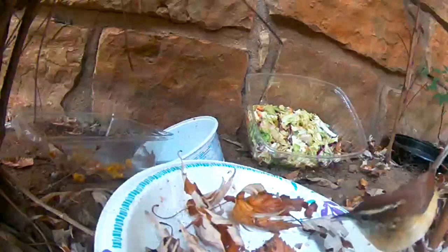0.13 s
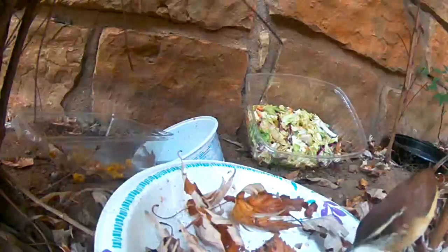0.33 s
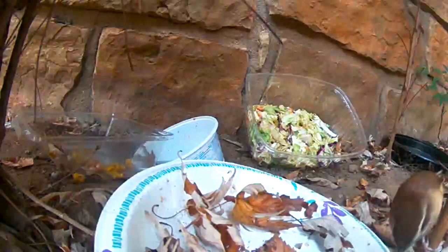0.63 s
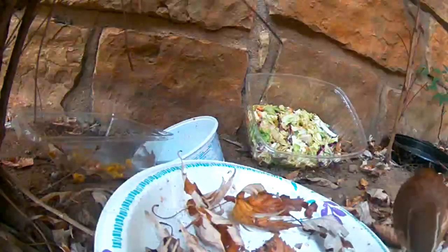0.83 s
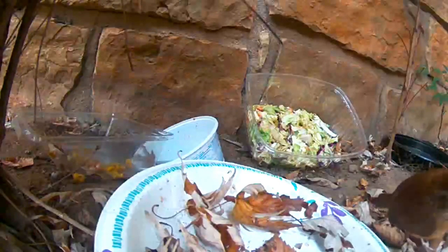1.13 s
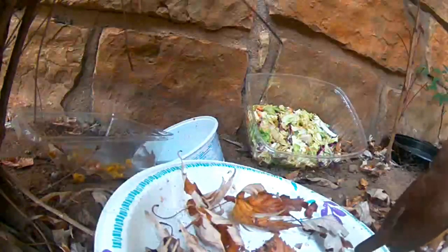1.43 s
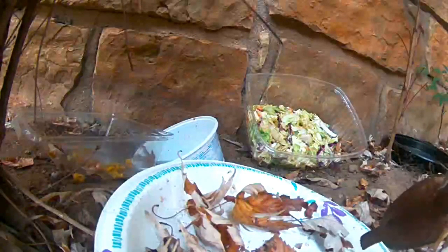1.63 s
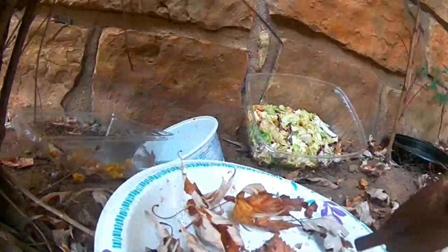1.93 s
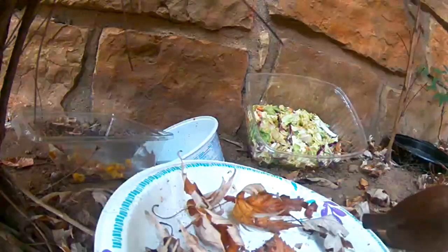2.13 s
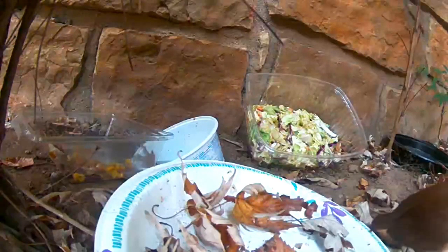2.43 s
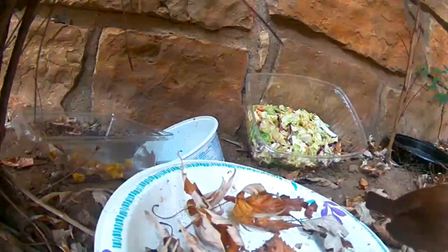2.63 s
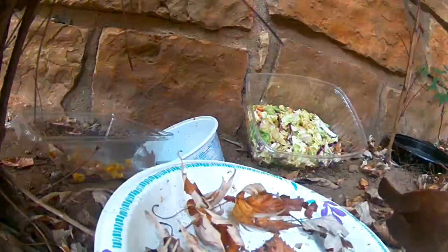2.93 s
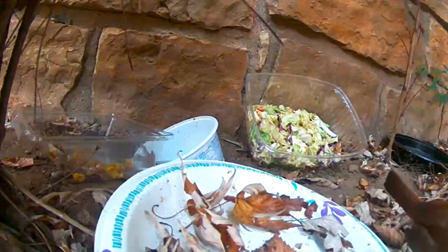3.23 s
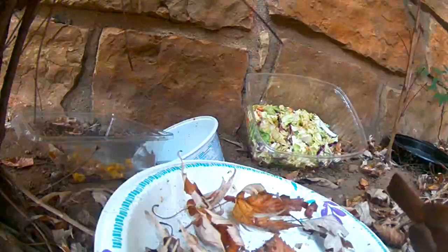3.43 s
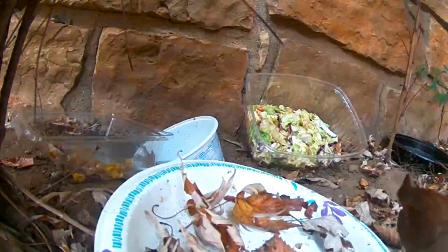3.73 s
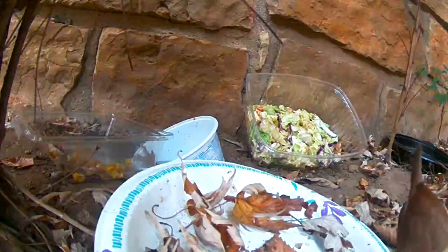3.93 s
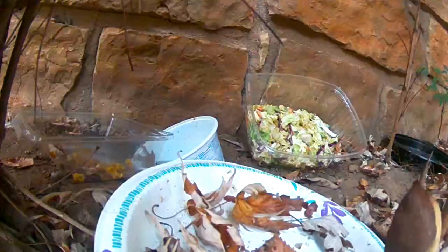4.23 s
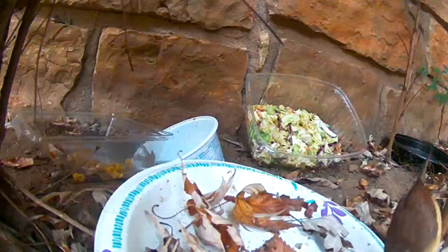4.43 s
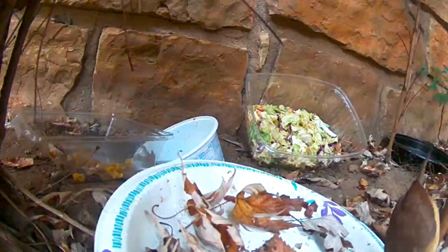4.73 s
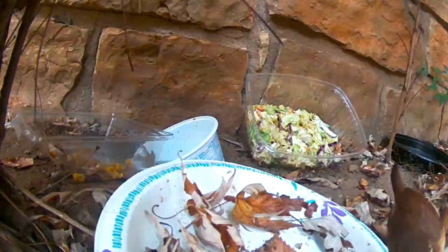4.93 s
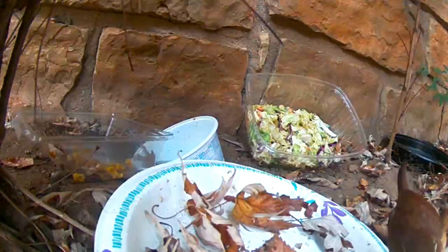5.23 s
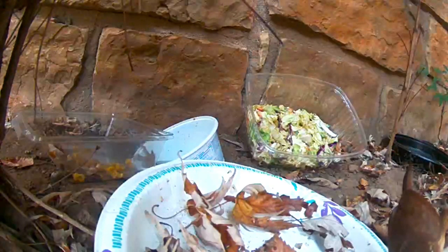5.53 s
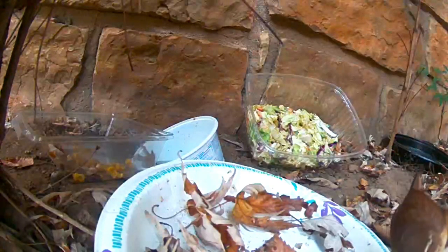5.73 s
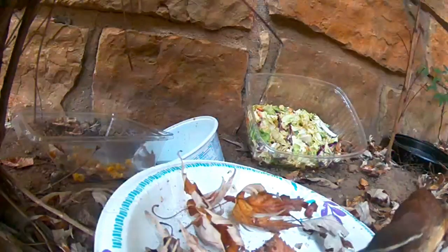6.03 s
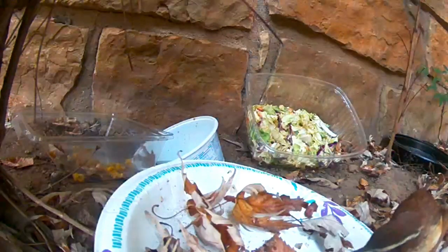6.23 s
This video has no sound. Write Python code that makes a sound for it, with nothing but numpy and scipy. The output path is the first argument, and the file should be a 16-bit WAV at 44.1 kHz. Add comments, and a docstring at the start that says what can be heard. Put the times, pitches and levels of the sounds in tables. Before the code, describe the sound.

A low rumble of distant traffic and a soft hiss run through about six seconds in a yard. During the first two seconds a wren gives faint, high chirps, with one clearer raspy chirp near 1.8 seconds. Very faint far calls come and go until 3.5 seconds, and a second wren steps lightly on dry leaves close by. From 2.4 to 4.2 seconds a wren sings a fast, rolling song: a phrase of four gliding, whistled notes repeated eight times, swelling at first and echoing slightly off a stone wall. Between 4.1 and 4.5 seconds the nearby bird makes several sharp pecks, one with a hollow knock on a plastic dish. Raspy single chirps come at 4.7 and 5.8 seconds, with fainter ones near 5. At 5.9 seconds there is a last bright click and a brief rattle of leaves.

```python
"""Distant traffic rumbles under soft single chirps and faint far calls in a yard with a stone wall.
A wren then sings a fast rolling song: eight turns of a four-note phrase, each note a gliding,
nearly pure tone that the wall and ground reflect. A second wren forages close by; its steps and
pecks are impacts that set dry leaves and plastic dishes ringing. More chirps follow the song."""
import sys
import numpy as np
from scipy import signal
from scipy.fft import rfft, irfft
from scipy.io import wavfile
from scipy.ndimage import uniform_filter1d

SR = 44100
rng = np.random.default_rng(int(sys.argv[2]) if len(sys.argv) > 2 else 0)


def transcribe(u):
    """Save the signal u as a 16-bit wav file named by the first command-line argument.

    u: samples, shape (n,) or (channels, n), limited to [-1, 1]; the rate is SR.
    q: integer samples, one column per channel.
    """
    v = np.clip(np.atleast_2d(u).T, -1, 1)
    q = np.round(v * 32767).astype(np.int16)
    wavfile.write(sys.argv[1], SR, q)


N = 280917

# Spectra of the traffic, the outdoor hiss and a contact's snap: f/Hz, relative level/dB
TRAFFIC_SPECTRUM = [(15, -10), (32, -1.5), (50, 1), (75, 1.5), (100, -7), (130, -4.5), (158, -4),
                    (195, -9.5), (250, -21.5), (320, -18), (420, -30), (700, -38), (1500, -74)]
HISS_SPECTRUM = [(200, -9.5), (400, -1.5), (520, -0.35), (680, -8), (830, -9), (1100, -12.5), (1600, -15.5),
                 (2500, -17.5), (4000, -20), (6300, -22), (8000, -27), (10000, -30.5), (12300, -38),
                 (14000, -70)]
SNAP_SPECTRUM = [(150, 9), (500, -6.5), (1500, 0.5), (3000, 5.5), (6300, 1), (8000, -8), (9800, -5.5),
                 (12000, -16), (15500, -32)]
# Faint far-off calls: t/s, duration/s, f/Hz, level/dB
DISTANT_CALLS = [(0.618, 0.15, 990, -69.5), (0.63, 0.44, 1430, -75.5), (1.502, 0.19, 854, -68),
                 (2.249, 0.18, 775, -65.5), (2.591, 0.24, 700, -68.5), (3.173, 0.3, 880, -72)]
# Light steps on dry leaves: t/s, level/dB
LEAF_STEPS = [(.886, -62), (1.278, -57.5), (1.305, -60), (1.4693, -53), (1.542, -57), (1.7517, -47),
              (1.9352, -49), (1.993, -55.5), (2.783, -58), (2.7967, -54.5), (4.856, -54)]
# Leaves settling after the hardest pecks: t/s, duration/s, level/dB, decay/(dB/s), tick spacing/s
LEAF_RATTLES = [(4.437, .035, -49.5, 0, .0098), (5.893, .05, -36.5, 484, .0048)]
# Modes of a plastic dish: f/Hz, relative level/dB, T60/s
DISH_MODES = [(497, 0, 0.017), (622, -2, 0.02), (1834, -3, 0.026), (2400, -7, 0.025)]
# Hard pecks: t/s, snap level/dB, ring f/Hz, ring level/dB, rustle level/dB, dish level/dB
BEAK_IMPACTS = [(4.114, -33, 1060, -40, -47.5, -64), (4.2609, -26, 957, -22.5, -31, -28),
                (4.274, -29, 7830, -23.5, -41, -45), (4.3919, -14.5, 4280, -34, -31.5, -50),
                (4.4093, -38, 753, -33, -65, -41.5), (4.4243, -26.5, 4530, -42, -46.5, -65),
                (5.894, -43, 6300, -14.5, -34, -43), (5.8953, -47, 9500, -21, -36, -60),
                (5.909, -46, 8100, -28.5, -41, -67)]
# Reflections from wall and ground: delay/ms, signed gain
REFLECTIONS = [(3.696, 0.36), (4.183, 0.14), (4.782, -0.013), (7.376, 0.13), (7.96, 0.013), (8.443, -0.17),
               (8.905, -0.23)]
# Contours of the four song notes and the lone chirp: t/ms, nominal f/Hz, nominal level/dB
SLIDE_CONTOUR = [(0, 4860, -78), (9.05, 4620, -56.5), (19.7, 4470, -53.5), (24.5, 4200, -41.5),
                 (33.4, 4130, -59), (43, 4200, -45)]
FLICK_CONTOUR = [(0, 3080, -54.5), (8.25, 3270, -32), (13.9, 3334, -36.5), (19.95, 3590, -37),
                 (24.6, 3850, -42), (31.5, 4150, -49)]
DROP_CONTOUR = [(0, 2850, -56.5), (6.7, 2580, -35), (12.8, 2320, -49.5), (22.05, 2210, -44),
                (27.25, 1935, -45.5), (37.2, 1380, -68.5)]
RISE_CONTOUR = [(0, 1840, -69.5), (7.9, 2150, -49), (16, 2430, -40), (20.15, 2560, -35),
                (23.9, 2783, -25.5), (28.3, 2960, -34), (36.2, 2900, -31), (42.2, 2880, -59),
                (50, 2900, -76)]
CHIRP_CONTOUR = [(0, 4750, -75), (20.03, 4450, -64), (34.7, 4150, -60.5), (48.35, 3850, -65),
                 (54.9, 3230, -55), (68.4, 3400, -58.5), (75, 3250, -68)]
# Lone chirps: t/s, level offset/dB, frequency ratio
LONE_CHIRPS = [(.085, -21, 1.3), (.16, -23, 1.05), (0.921, -21, 1.15), (1.255, -17, 1.42), (1.33, -22, 1.1),
               (1.645, -18, 1.16), (1.761, -2, 0.97), (4.667, -1, .995), (4.93, -19, 1.2),
               (4.985, -21, 1.06), (5.816, 0.5, 0.98)]
# Turns of the phrase: t/s, level offset/dB, frequency ratio of the high notes, that of the low notes
SONG_TURNS = [(2.405, -6.5, 1.14, 0.98), (2.632, -4, 0.99, 0.98), (2.8548, -1, 1.016, 1.005),
              (3.078, 0.5, 1.054, 1.004), (3.302, .5, 1, 1.003), (3.526, 0.5, 1.008, 1.012),
              (3.7515, 0.5, 1.05, 1.01), (3.979, 0, 1, 1.002)]


def from_db(db):
    """Amplitude grows tenfold for every 20 dB."""
    return 10 ** (np.asarray(db) / 20)


def unit_rms(x):
    """Normalisation to unit mean power."""
    return x / np.sqrt(np.mean(x ** 2) + 1e-20)


def add(track, start_s, sound):
    """Superposition: a sound adds to the track from its onset."""
    at = max(round(start_s * SR), 0)
    track[at:at + len(sound)] += sound[:max(N - at, 0)]


def bin_gains(spectrum, size):
    """Level interpolated over log frequency gives the gain of each transform bin."""
    hz, db = np.transpose(spectrum)
    bin_hz = np.arange(size // 2 + 1) * SR / size
    return from_db(np.interp(np.log(bin_hz + 1), np.log(hz), db))


def shaped_noise(spectrum):
    """Filtered white noise takes on the filter's spectrum; rms 1."""
    return unit_rms(irfft(rfft(rng.standard_normal(N)) * bin_gains(spectrum, N), N))


def background(traffic_db=-45.5, hiss_db=-64):
    """Stationary noise: low traffic rumble under an even outdoor hiss."""
    traffic = from_db(traffic_db) * shaped_noise(TRAFFIC_SPECTRUM)
    return traffic + from_db(hiss_db) * shaped_noise(HISS_SPECTRUM)


def far_calls(width_hz=170):
    """Propagation over a distance smears each call into a soft swell of narrow-band noise."""
    out = np.zeros(N)
    for start, duration, hz, db in DISTANT_CALLS:
        band = signal.butter(2, [hz - width_hz / 2, hz + width_hz / 2], "band", fs=SR, output="sos")
        swell = signal.windows.tukey(int(duration * SR), .5)
        call = signal.sosfilt(band, rng.standard_normal(SR))[:len(swell)]
        add(out, start, from_db(db) * swell * unit_rms(call))
    return out


def click(spectrum, size=512):
    """Minimum phase gives the most compact causal pulse with a given spectrum; peak 1."""
    cepstrum = irfft(np.log(bin_gains(spectrum, size)))
    cepstrum[1:size // 2] *= 2
    cepstrum[size // 2 + 1:] = 0
    pulse = irfft(np.exp(rfft(cepstrum)))
    return pulse / np.abs(pulse).max()


def contact(snap_db, ring_hz, ring_db, rustle_db, rustle_s=.003, tail_db=-23, tail_s=.023):
    """Impulsive excitation: a contact snaps, rings for a few cycles and shakes the leaves."""
    t = np.arange(SR // 8) / SR
    rustle_decay = np.exp(-t / rustle_s) + from_db(tail_db) * np.exp(-t / tail_s)
    force = from_db(rustle_db) * rng.standard_normal(len(t)) * rustle_decay / 2
    force[0] += from_db(snap_db)
    onset = 1 - np.exp(-2 * ring_hz * t)   # a thin leaf or shell gets moving in about half a cycle
    decay_s = .00032 + 1 / ring_hz
    ring = from_db(ring_db) * np.sin(2 * np.pi * ring_hz * t) * np.exp(-t / decay_s) * onset
    return signal.fftconvolve(force, click(SNAP_SPECTRUM))[:len(t)] + ring


def leaves(leaf_hz=5850, pitch_spread=.16, gap_spread=.2, spread_db=.5, snap_above_db=4.5):
    """Damped vibration: a leaf ticks at every step, and in uneven runs as the litter settles."""
    out, ticks = np.zeros(N), list(LEAF_STEPS)
    for start, duration, db, fade, gap in LEAF_RATTLES:
        timing, softness = rng.standard_normal((32, 2)).T
        delays = gap * (np.arange(len(timing)) + gap_spread * timing)
        levels = db - fade * delays - spread_db * softness
        ticks += [(start + delay, level) for delay, level in zip(delays, levels) if delay < duration]
    for start, db in ticks:
        ring_hz = leaf_hz * np.exp(pitch_spread * rng.standard_normal())
        add(out, start, contact(db + snap_above_db, ring_hz, ring_db=db, rustle_db=db))
    return out


def pecks(dish_attack_s=.00089):
    """Each peck is a sharp contact; on a dish it excites normal modes, heard as a hollow knock."""
    out, t = np.zeros(N), np.arange(SR // 8) / SR
    modes = sum(from_db(db - 60 * t / t60) * np.sin(2 * np.pi * hz * t) for hz, db, t60 in DISH_MODES)
    knock = modes * (1 - np.exp(-t / dish_attack_s))
    for start, snap_db, ring_hz, ring_db, rustle_db, dish_db in BEAK_IMPACTS:
        add(out, start, contact(snap_db, ring_hz, ring_db, rustle_db) + from_db(dish_db) * knock)
    return out


def foraging(bounce_s=.0013, bounce_db=-11):
    """Pecks and leaf ticks interfere with their immediate reflection from the ground."""
    direct = pecks() + leaves()
    out = direct.copy()
    add(out, bounce_s, from_db(bounce_db) * direct)
    return out


def yard(x, scatter_db, scatter_s, tail_db, tail_delay_s=.058, t60_s=1.74):
    """Reverberation: hard echoes, quick scattering off stones and twigs, a thin tail from farther off."""
    t = np.arange(SR) / SR
    scatter, tail = rng.standard_normal((2, len(t)))
    scatter = unit_rms(scatter * np.exp(-t / scatter_s) * (t > .006))
    tail = unit_rms(tail * from_db(-60 * t / t60_s) * (t > tail_delay_s))
    response = (from_db(scatter_db) * scatter + from_db(tail_db) * tail) / np.sqrt(len(t))
    response[0] += 1   # direct path
    for delay_ms, gain in REFLECTIONS:
        response += gain * np.sinc((t - delay_ms / 1000) * SR)
    return signal.fftconvolve(x, response)[:N]


def quiver(count, window=128):
    """Moving averages smooth noise into swings of a few milliseconds; rms about 1."""
    smoothed = uniform_filter1d(rng.standard_normal(8192), window)
    return unit_rms(uniform_filter1d(smoothed, window))[:count]


def whistles(contour, notes, waver, flutter_db, overtone_db=-48, edge_s=.0025):
    """A nearly pure tone follows a contour; random frequency and amplitude modulation vary each note."""
    out = np.zeros(N)
    knot_ms, hz, db = np.transpose(contour)
    t_ms = np.arange(0, knot_ms[-1], 1000 / SR)
    soft_edges = np.clip(np.minimum(t_ms, t_ms[::-1]) / 1000 / edge_s, 0, 1)
    for start, offset_db, ratio in notes:
        pitch = np.interp(t_ms, knot_ms, hz) * ratio * (1 + waver * quiver(len(t_ms), window=48))
        phase = 2 * np.pi * np.cumsum(pitch) / SR
        tone = np.sin(phase) + from_db(overtone_db) * np.sin(2 * phase)
        level = np.interp(t_ms, knot_ms, db) + offset_db + flutter_db * quiver(len(t_ms))
        add(out, start, np.sqrt(2) * from_db(level) * soft_edges * tone)
    return out


def wren_chirps():
    """Rapid frequency modulation makes the lone chirps raspy; they arrive mostly by reflection."""
    chirps = whistles(CHIRP_CONTOUR, LONE_CHIRPS, waver=.056, flutter_db=2.5)
    return yard(chirps, scatter_db=2, scatter_s=.018, tail_db=-12)


def wren_song(flick_at_s=.037, drop_at_s=.09, rise_at_s=.156, rise_fade_db_per_s=3):
    """Four frequency glides form each turn: a high slide, an upward flick, a drop and a rise."""
    starts, db, high, low = np.transpose(SONG_TURNS)
    rise_db = db - .5 - rise_fade_db_per_s * (starts - starts[0])   # weakens as the song goes on
    slide = whistles(SLIDE_CONTOUR, zip(starts, db, high), waver=.03, flutter_db=2.5)
    flick = whistles(FLICK_CONTOUR, zip(starts + flick_at_s, db, high), waver=.0076, flutter_db=1)
    drop = whistles(DROP_CONTOUR, zip(starts + drop_at_s, db, low), waver=.027, flutter_db=2.1)
    rise = whistles(RISE_CONTOUR, zip(starts + rise_at_s, rise_db, low), waver=.0047, flutter_db=2.5)
    return yard(slide + flick + drop + rise, scatter_db=-9, scatter_s=.021, tail_db=-21.5)


def scene():
    """The pressures of all the sources add at one microphone."""
    return (background() + wren_song() + wren_chirps() + far_calls() + foraging())[None]


def record(dry, mirror_16k_db=-20, mirror_12k_db=-35, treble_hz=3700, cutoff_hz=15850):
    """Imaging: crude resampling mirrors the treble faintly about 16 and 12 kHz; the top is cut."""
    carriers = 2 * np.cos(2 * np.pi * np.outer([16000, 12000], np.arange(N) / SR))
    treble = signal.sosfilt(signal.butter(2, treble_hz, "high", fs=SR, output="sos"), dry)
    images = treble * (from_db(mirror_16k_db) * carriers[0] + from_db(mirror_12k_db) * carriers[1])
    lowpass = signal.ellip(10, .1, 80, cutoff_hz, fs=SR, output="sos")
    return signal.sosfilt(lowpass, dry + images)


dry = scene()
out = record(dry)
transcribe(out)
```